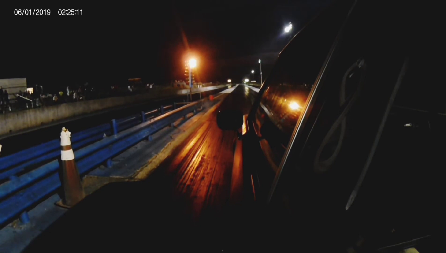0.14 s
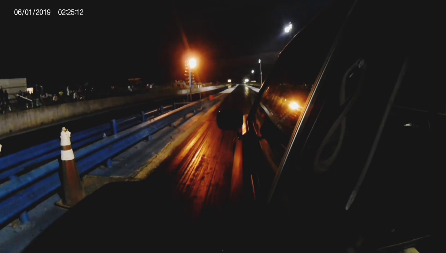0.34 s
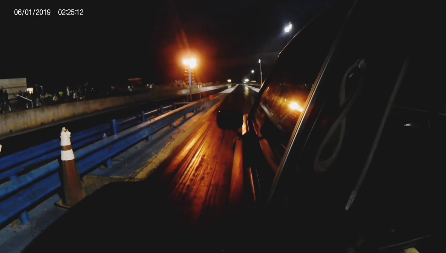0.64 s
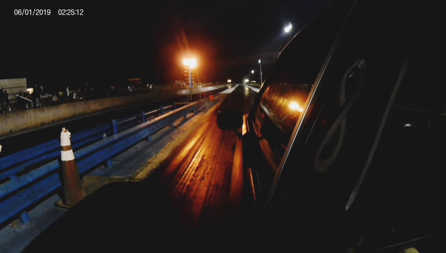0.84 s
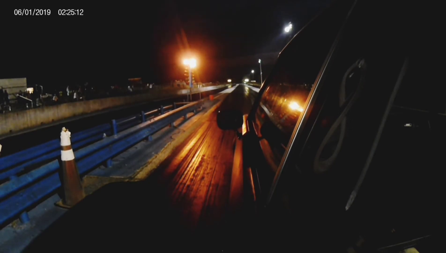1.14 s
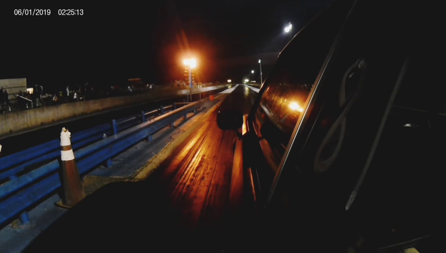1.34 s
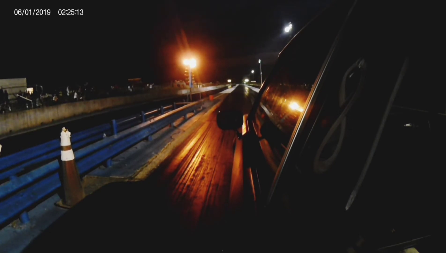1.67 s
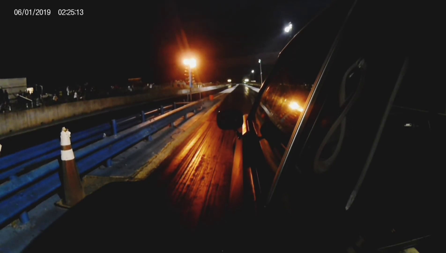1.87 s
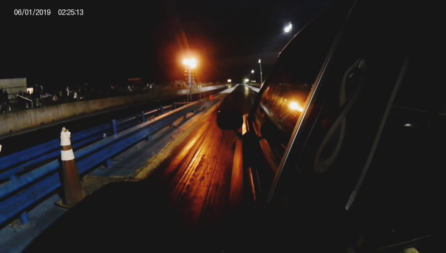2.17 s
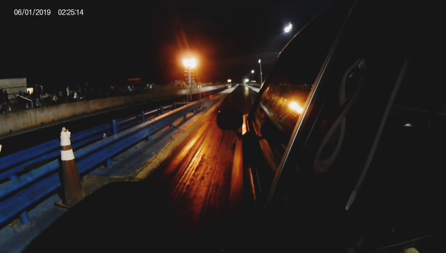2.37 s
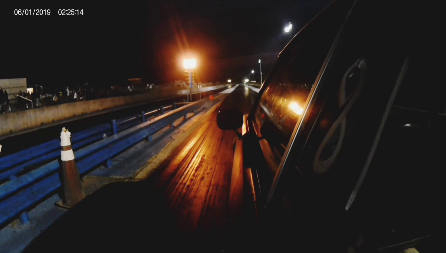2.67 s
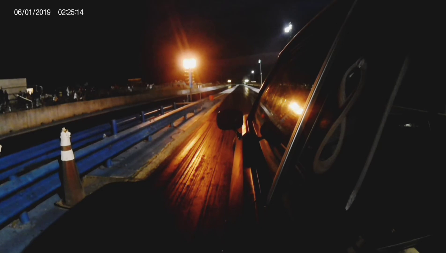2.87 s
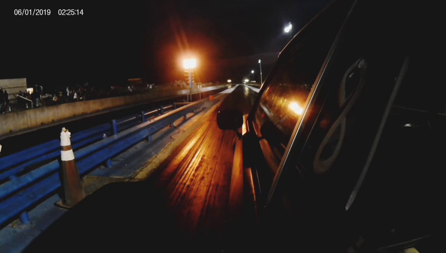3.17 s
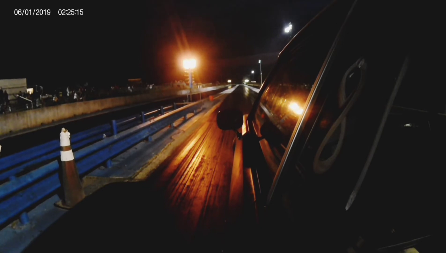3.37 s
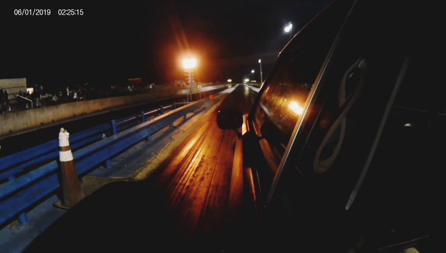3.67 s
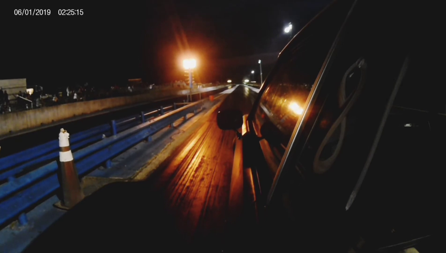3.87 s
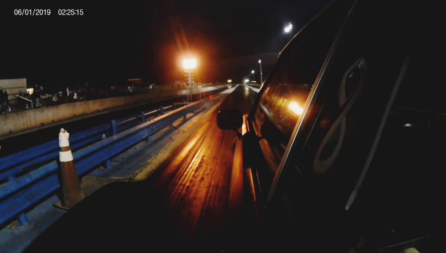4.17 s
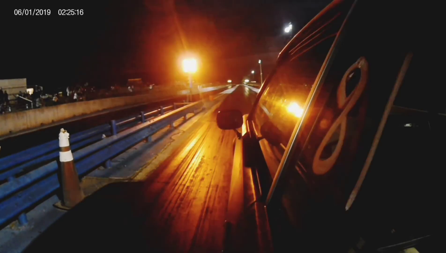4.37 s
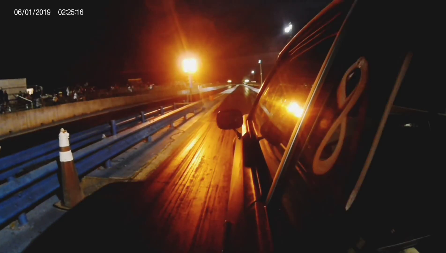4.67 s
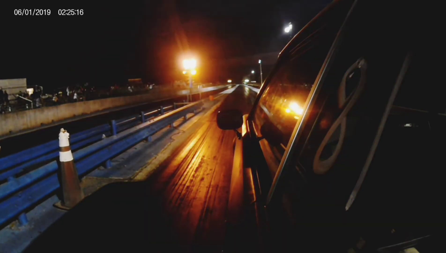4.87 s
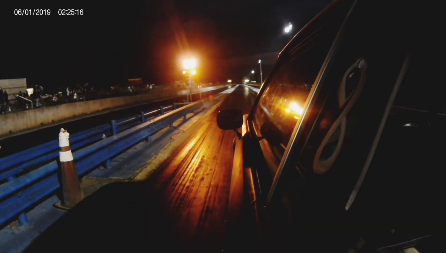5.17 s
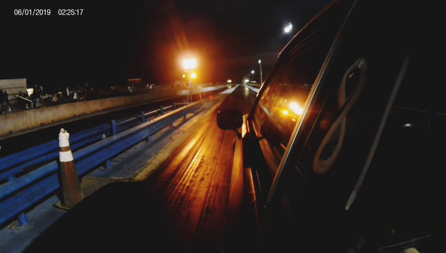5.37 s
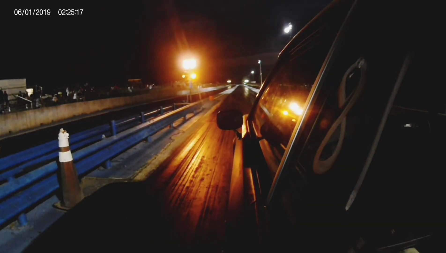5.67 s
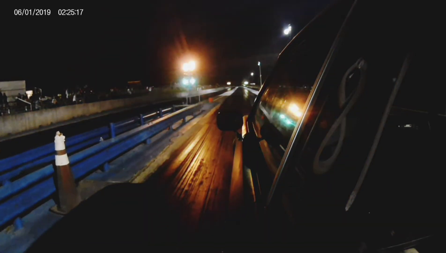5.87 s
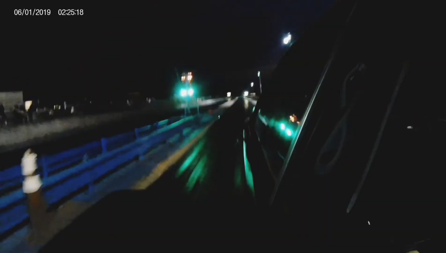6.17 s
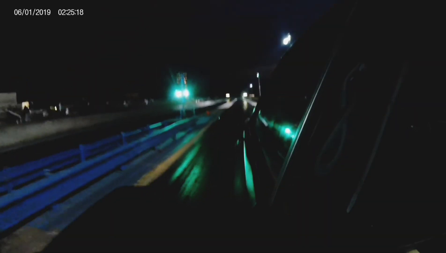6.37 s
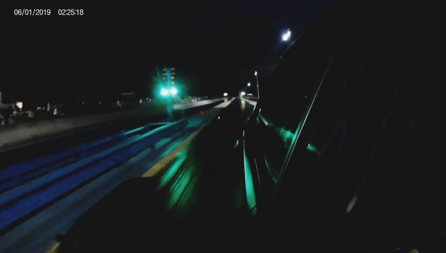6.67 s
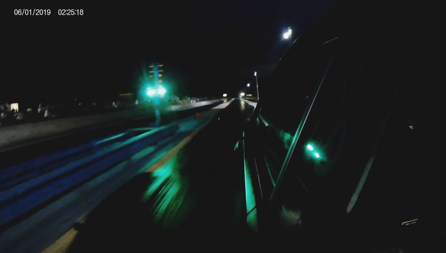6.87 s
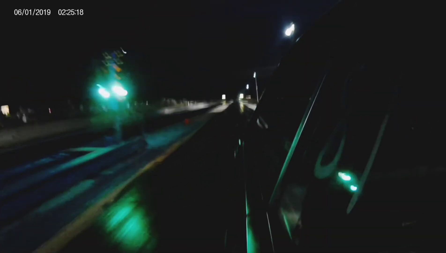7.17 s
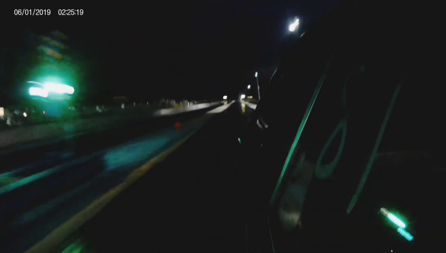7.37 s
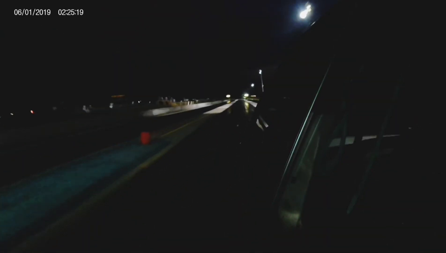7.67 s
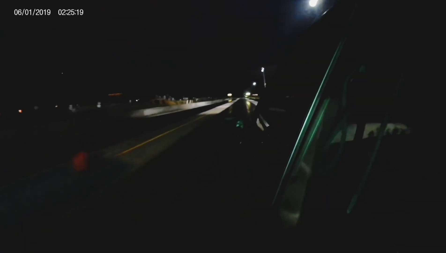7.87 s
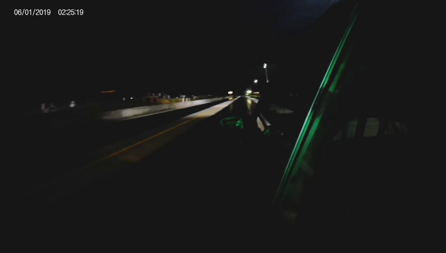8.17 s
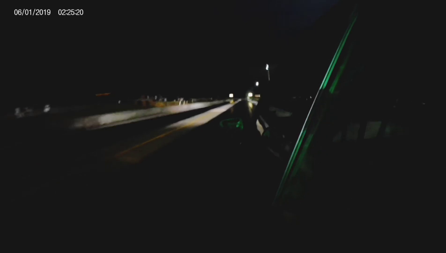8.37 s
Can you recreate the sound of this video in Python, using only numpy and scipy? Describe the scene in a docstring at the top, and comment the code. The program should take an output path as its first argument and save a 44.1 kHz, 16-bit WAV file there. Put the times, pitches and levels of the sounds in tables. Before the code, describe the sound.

Close, vibrating on-car perspective: lumpy V8 idle, deep flutter near ninety hertz and small housing knocks for three seconds, then nearly three seconds of choppy buzzing rattles as the engine strains on the brake. The revs leap, and a much louder, slightly saturated exhaust roar pulls down the track with low wind rumble, rasping panels and a late heavy shudder.

```python
"""Supercharged V8 at the start line

The engine lopes, surges against the brake, then launches; the microphone rides on its flank.
Exhaust orders are sums of sines and the roar is noise pulsed by the firings; both ring the bodywork.
The mount swings near 90 Hz as a rough sine and its housing knocks in each half swing, as struck modes.
A pump hums in steady harmonics; filtered noise gives the wind and road buffet and a thin whistle."""
import sys
import numpy as np
from scipy import signal
from scipy.fft import rfft, irfft
from scipy.io import wavfile
from scipy.ndimage import uniform_filter1d

SR = 44100
rng = np.random.default_rng(int(sys.argv[2]) if len(sys.argv) > 2 else 0)


def to_wav(sig):
    """Store sig (one row per channel, or 1-D mono) as 16-bit WAV at the path in sys.argv[1].

    Samples outside -1..1 are clipped; the rate is SR.
    """
    pcm = np.clip(np.atleast_2d(sig), -1, 1) * 32767
    pcm = np.round(pcm).astype(np.int16)
    wavfile.write(sys.argv[1], SR, pcm.T)  # frames by channels


N = 376173

# bodywork resonances: f/Hz, width/Hz, relative level/dB
BODY_MODES = [(90, 6.7, 7.5), (192.5, 45.6, -1.5), (232.6, 16, 3), (292, 16, -14), (539, 44, -8.5),
              (636, 36.7, 2.5), (807, 25.6, 0), (940, 23, -9), (1110, 9, -14), (1188.5, 52.5, 1),
              (1237, 25, -0.5), (1280, 48, -33), (1930, 70, -22.5), (2050, 38, -15)]
# panel behind the mount, rung by knocks and by the idling engine: f/Hz, width/Hz, relative level/dB
PANEL_MODES = [(630, 26, 0), (870, 60, -10), (670, 18, -3), (1090, 20, -11), (1240, 50, -8)]
STAGED_S, LAUNCH_S = 3.15, 5.85  # between these the firing order is heard as the swing of the mount
REST_DB = -61.5  # rattle between surges


def undb(db):
    """Amplitude ratio of a level: 20 dB for each factor of ten."""
    return 10 ** (np.asarray(db) / 20)


def level(x, db):
    """Normalization of the effective (rms) value to a level."""
    return x * undb(db) / np.sqrt(np.mean(x ** 2))


def read(table):
    """Linear interpolation of a curve's columns, one value a sample."""
    s, *columns = np.transpose(table)
    t = np.arange(N) / SR
    return [np.interp(t, s, column) for column in columns]


def band(x, hz, width):
    """Simple resonance with unit gain at its centre."""
    return signal.lfilter(*signal.iirpeak(hz, hz / width, fs=SR), x)


def modes(x, table):
    """Modal superposition: successive modes have opposite sign, which leaves notches between neighbours."""
    out = 0
    for k, (hz, width, db) in enumerate(table):
        out = out + (-1) ** k * undb(db) * band(x, hz, width)
    return out


def colour(x, points):
    """Spectral shaping by a gain curve, straight in dB over log frequency."""
    hz, db = np.transpose(points)
    f = np.arange(N // 2 + 1) * SR / N + 1
    gain = undb(np.interp(np.log(f), np.log(hz), db))
    return irfft(rfft(x) * gain, N)


def walk(rate):
    """Slow random modulation: levels held 1 / rate s and smoothed twice; spread near 1."""
    hold = int(SR / rate)
    held = np.repeat(rng.standard_normal(N // hold + 1), hold)
    return 1.32 * uniform_filter1d(uniform_filter1d(held, hold), hold)[:N]


def noise_band(noise, hz, width):
    """Narrow-band noise of unit rms: two equal resonances in series."""
    return level(band(band(noise, hz, width), hz, width), 0)


def air():
    """Turbulence as low band noise with a wavering level, and a whistle as narrow-band noise."""
    # road and wind buffet: t/s, level/dB
    buffet = [(0, -45.5), (5.85, -56), (6.07, -28.5), (6.41, -24.5), (6.52, -30), (6.69, -30.5),
              (6.76, -26), (7.23, -29), (7.39, -33), (7.72, -44), (8.13, -38), (8.53, -40)]
    # thin whistle: start t/s, end t/s, level/dB
    whistle = [(7.539, 7.736, -40.5), (8.282, 8.407, -43)]
    whistle_hz = 8910
    t = np.arange(N) / SR
    low = band(band(rng.standard_normal(N), 70, 22), 68, 27) * undb(3.1 * walk(4.2))
    low = level(low, 0) + level(band(rng.standard_normal(N), 28, 14), -11)
    thin = level(band(band(rng.standard_normal(N), whistle_hz, 117), whistle_hz, 200), 0)
    gate = sum(undb(db) * np.clip(np.minimum(t - a, b - t) / .03, 0, 1) for a, b, db in whistle)
    return undb(read(buffet)[0]) * level(low, 0) + gate * thin


def stray():
    """Frequency-modulated sines: two short wavering tones that do not follow the revs."""
    # one curve for each tone: t/s, f/Hz, mean level/dB
    tones = [
        [(5.45, 292, -51), (5.6, 298, -34.5), (5.8, 298, -40.5), (5.92, 296, -24.5), (6.05, 294, -32)],
        [(8.15, 445, -29.5), (8.25, 462, -23), (8.4, 500, -30), (8.53, 535, -27)],
    ]
    out = 0
    for rows in tones:
        (start_s, start_hz, _), (end_s, end_hz, _) = rows[0], rows[-1]
        faded = [(start_s - .05, start_hz, -80)] + list(rows) + [(end_s + 0.053, end_hz, -80)]
        hz, db = read(faded)
        tone = np.sin(2 * np.pi * np.cumsum(hz) / SR)
        out = out + np.sqrt(2) * undb(db + 3.8 * walk(30)) * tone
    return out


def pump():
    """Harmonic series: an electric pump buzzes on multiples of its nearly steady shaft rate."""
    shaft_hz = 83.9
    # multiple of the shaft rate, level/dB before a common gain of 0.5 dB
    harmonics = [(2, -42), (4, -59), (5, -58), (6, -56), (7, -53), (10, -57), (11, -56), (12, -58),
                 (14, -59), (16, -62)]
    turn = 2 * np.pi * np.cumsum(shaft_hz * (1 + 0.001983 * walk(2.017))) / SR
    out = 0
    for k, db in harmonics:
        out = out + np.sqrt(2) * undb(db + 0.5 + 3 * walk(9)) * np.sin(k * turn + k * k)
    return out


def knocks():
    """Impulse sequence: time, level and sharpness of lone knocks, clear ones fixed and soft ones random."""
    # clearest single knocks of the housing: t/s, relative level/dB
    clear = [(0.012, -23.5), (0.0215, -33), (0.0342, -43), (0.078, -39), (0.089, -31), (0.1002, -44),
             (0.1501, -39), (0.1929, -43), (0.2453, -37), (0.2541, -30), (0.2647, -27), (0.2738, -30),
             (0.3547, -33), (0.4228, -43), (0.4422, -38), (0.5637, -35), (0.6505, -35), (0.6666, -41),
             (0.702, -32), (0.713, -43), (0.846, -39), (0.9608, -33), (1.0712, -34.5), (1.079, -40),
             (1.1187, -32), (1.1346, -29), (1.1407, -39), (1.1757, -42), (1.1856, -35), (1.2016, -41),
             (1.2277, -37), (1.2603, -27.5), (1.2804, -39), (1.292, -40), (1.3268, -37), (1.3373, -44),
             (1.3618, -31), (1.3692, -37), (1.374, -29), (1.4674, -40), (1.4953, -37), (1.6127, -38),
             (1.7154, -34), (1.824, -35), (1.8298, -45), (1.8407, -34), (1.9064, -27.5), (1.9164, -29),
             (1.9456, -28), (2.0218, -41), (2.0421, -35), (2.0578, -38), (2.0733, -43), (2.1069, -39),
             (2.1137, -36), (2.2045, -39), (2.2177, -33), (2.2373, -26.5), (2.275, -35), (2.2862, -26),
             (2.3156, -37), (2.3253, -25), (2.3335, -38), (2.3706, -44), (2.4073, -38), (2.4176, -34),
             (2.446, -26), (2.4566, -33), (2.4784, -35), (2.4948, -38), (2.5318, -34), (2.5516, -37),
             (2.5827, -36), (2.6188, -35), (2.6455, -35), (2.6553, -33), (2.7356, -34), (2.7878, -26),
             (2.8395, -41), (2.8473, -40), (2.8988, -18.5), (2.9044, -27), (2.914, -39), (2.985, -30),
             (2.9969, -34), (3.0078, -28), (3.0915, -39), (3.1043, -39), (3.1253, -42), (3.1451, -32),
             (3.1596, -14), (3.2394, -20), (3.2451, -15), (3.256, -24), (3.2662, -24), (3.2827, -20),
             (3.2931, -18), (3.385, -24), (3.4138, -19.5), (3.418, -27), (3.4231, -21), (3.4604, -23),
             (3.4666, -18), (3.5054, -20), (3.5103, -28), (3.552, -26), (3.5564, -20), (3.5676, -24),
             (3.653, -20), (3.6593, -20), (3.6865, -26), (3.697, -20), (3.721, -21), (3.739, -13.5),
             (3.754, -18), (3.7774, -24), (3.7827, -16), (3.8167, -21), (3.8277, -16), (3.833, -17),
             (3.8723, -18), (3.9285, -18), (3.9339, -21), (3.965, -24), (4.022, -36), (4.1259, -34),
             (4.1468, -20.5), (4.1636, -24), (4.2036, -26), (4.2139, -30), (4.227, -25), (4.2524, -32),
             (4.284, -28), (4.2923, -29), (4.3303, -30), (4.3359, -32), (4.3884, -23), (4.4018, -21),
             (4.421, -20), (4.4306, -16.5), (4.4605, -24), (4.4695, -19), (4.4761, -17), (4.5096, -31),
             (4.5207, -29), (4.5803, -26), (4.5927, -25), (4.6103, -19.5), (4.6176, -28), (4.6289, -23),
             (4.6989, -19), (4.7084, -17.5), (4.746, -21), (4.7575, -19), (4.7797, -30), (4.8165, -27.5),
             (4.8277, -27), (4.8653, -40), (4.8822, -35), (4.8881, -37), (4.8956, -36), (4.9425, -21),
             (4.9537, -29), (4.9647, -26), (5.005, -30), (5.0585, -26), (5.0713, -19), (5.1122, -29),
             (5.1284, -21), (5.1389, -22), (5.1611, -22), (5.1725, -24), (5.181, -26), (5.224, -32),
             (5.3151, -22), (5.324, -26), (5.3351, -24), (5.3505, -24), (5.3553, -15), (5.3853, -21),
             (5.399, -14), (5.4344, -17), (5.4452, -22), (5.4502, -28), (5.4812, -23), (5.49, -21),
             (5.5303, -17), (5.5428, -29), (5.5763, -24), (5.5982, -18), (5.6419, -15), (5.7519, -19),
             (5.762, -16), (5.8319, -19), (5.848, -14.5)]
    soft_count, soft_db, soft_spread_db = 60, -52, 2
    sharp_db, sharp_spread_db = -11.5, 2  # sharp part of any knock, relative to the dull part
    even = rng.random(soft_count)
    chance = rng.standard_normal((soft_count + len(clear), 2))
    soft = np.transpose([STAGED_S * even, soft_db + soft_spread_db * chance[:soft_count, 0]])
    s, db = np.vstack([soft, clear]).T
    return zip(s, db, np.minimum(sharp_db + sharp_spread_db * chance[:, 1], 0))


def rattle(halves, loose_db):
    """Impact excitation of modes: the loose housing knocks once a half swing, harder on one side, and scrapes."""
    # dull, sharp and thin housing modes: f/Hz, width/Hz, relative level/dB
    housing = [(510, 204, 1), (1210, 600, -4), (2176, 427, 4)]
    # modes of the sharp part of the blows: f/Hz, width/Hz, relative level/dB
    edge_modes = [(3523, 120, 4), (4514, 316, 0.5), (4647, 410, -1.5), (6350, 2100, -9)]
    # modes of the thin scraping noise: f/Hz, width/Hz, relative level/dB
    thin_modes = [(8750, 300, -21), (11560, 160, -20)]
    knock_db, panel_db = 21, -1  # gain of the lone blows; panel ringing
    count = halves.astype(int)
    chance = np.clip(rng.standard_normal((N // 100, 3)), -2, 1.5)
    # contact falls about 0.3 of the way through each half swing
    since = halves % 1 - np.clip(0.3048 + .08 * chance[count, 0], .05, .9)
    contact = np.diff(1. * (since > 0), prepend=0) > 0
    lopsided_db = np.clip(.8 * (-26 - loose_db), 3, 12)  # gentle swings favour one stop
    size = undb(2.2 * chance[count, 1] - lopsided_db * (count % 2))
    side = 1 - 2 * (count % 2)
    # the scrape swells into the contact and dies away after it
    scrape = size * np.exp(-np.abs(since) / np.where(since > 0, .22, .16)) + .06
    noise = rng.standard_normal(N)
    dull = undb(loose_db + 35) * (side * size * contact + 0.14 * scrape * noise)
    sharp = undb(-6.5 + 1.8 * chance[count, 2]) * dull
    thin = modes(undb(loose_db + 18.0) * noise, thin_modes)

    t, hit_s = np.arange(N // 1000) / SR, 30 / SR
    burst = 0.17 * np.exp(-np.abs(t - hit_s) / np.where(t > hit_s, .0018, .001))
    for s, db, sharp_db in knocks():
        at = slice(int(s * SR), int(s * SR) + len(t))
        blow = undb(knock_db + db) * ((t == hit_s) + burst * noise[at])
        dull[at] += blow
        sharp[at] += undb(sharp_db) * blow

    edge_band = signal.butter(4, [2900, 6800], "band", fs=SR, output="sos")
    edge = signal.sosfilt(edge_band, modes(sharp, edge_modes))
    body = band(modes(dull, housing), 1300, 2700)
    panel = undb(panel_db) * modes(dull, PANEL_MODES)
    return body + panel + edge + band(thin, 9200, 5000)


def surge():
    """Piecewise-linear envelope in dB: each surge lifts the rattle by a quick rise, a slope, a slower fall."""
    # surges against the brake: start t/s, end t/s, rattle level/dB at start, rattle level/dB at end
    surges = [(3.218, 3.291, -33.5, -29.5), (3.384, 3.433, -35.5, -29.5), (3.459, 3.52, -32, -32),
              (3.535, 3.571, -32.5, -33.5), (3.588, 3.631, -33, -34.5), (3.645, 3.707, -32, -32.5),
              (3.72, 3.79, -34.5, -27.5), (3.808, 3.958, -30.5, -33), (4.142, 4.168, -46, -45),
              (4.214, 4.23, -36.5, -42), (4.258, 4.34, -47, -49.5), (4.398, 4.532, -32, -33),
              (4.572, 4.674, -37.5, -40), (4.694, 4.708, -40, -39), (4.749, 4.9, -41, -48.5),
              (4.957, 4.962, -32, -38.5), (5.0, 5.018, -45, -46), (5.047, 5.18, -40.5, -36),
              (5.311, 5.687, -35, -29), (5.749, 5.757, -30, -36.5), (5.838, 5.847, -24, -36)]
    rise_db_s, fall_db_s = 1001.5, 447.5
    t, out = np.arange(N) / SR, np.full(N, 1. * REST_DB)
    for a, b, a_db, b_db in surges:
        times = [a - (a_db - REST_DB) / rise_db_s, a, b, b + (b_db - REST_DB) / fall_db_s]
        out = np.maximum(out, np.interp(t, times, [REST_DB, a_db, b_db, REST_DB]))
    return out


def mount(cycle_hz, lift_db):
    """Oscillation of the mount: a near sine and a rough upper skirt that fades with revs; also half swings."""
    # swing without surges and brief drops: t/s, mean f/Hz, level/dB
    swing_curve = [(0, 94.64, -23), (.6, 90, -25.5), (1.1, 95.35, -26), (1.35, 95.7, -24),
                   (1.6, 91.04, -24), (2.25, 88.87, -22.5), (2.7, 96.7, -25.5), (3.1, 92.94, -22.5),
                   (3.26, 95.34, -21.5), (3.53, 88.75, -23), (3.93, 88.14, -21), (4.1, 84.86, -22),
                   (4.42, 88.16, -24.5), (5.57, 87.9, -23), (5.67, 92.2, -19), (5.85, 116.9, -27),
                   (5.95, 120.5, -20), (5.99, 121.9, -69), (7.6, 83.84, -56), (7.69, 83.1, -27),
                   (7.84, 87.93, -19), (8.02, 88.17, -8.5), (8.28, 90.7, -10.5), (8.36, 89.1, -22),
                   (8.53, 89.6, -26)]
    # brief drops of the swing, at idle, between surges and at launch: t/s, depth/dB, half length/s
    drops = [(0.23, 3, 0.019), (0.326, 12, 0.034), (0.392, 9, 0.037), (0.519, 13, 0.026), (0.752, 7, 0.065),
             (0.965, 8, 0.052), (1.212, 7.5, 0.044), (1.296, 27, 0.022), (1.487, 14, 0.11),
             (1.77, 10, 0.065), (1.96, 12, 0.047), (2.167, 14, 0.029), (2.4, 16, 0.036), (2.59, 6, 0.046),
             (2.718, 15, 0.059), (3.2, 9.5, 0.03), (3.994, 9, 0.029), (4.047, 7, 0.023), (5.718, 10, 0.026),
             (5.892, 27, 0.041)]
    t, (hz, db) = np.arange(N) / SR, read(swing_curve)
    db = db + lift_db
    for s, depth_db, half in drops:
        db = db - np.interp(t, [s - half, s, s + half], [0, depth_db, 0])
    slow = 11 - cycle_hz  # slow running is less regular
    turns = np.cumsum(hz * (1 + .045 * np.clip(slow, .2, 1) * walk(25))) / SR
    second = undb(-17) * np.clip(slow, .4, 1) * np.sin(4 * np.pi * turns + 1.)
    swing = np.sin(2 * np.pi * turns) + second
    skirt = level(band(band(rng.standard_normal(N), 110.5, 14), 106.0, 17), -11.5) * (9 / cycle_hz) ** 2
    waver_db = np.clip(15 / cycle_hz, 0, 2) * walk(22.09)
    return np.sqrt(2) * undb(db + waver_db) * (swing + skirt), 2 * turns


def roar(hz, scatter_db):
    """Pulsed turbulence: a puff of gas after each firing rings the bodywork; blower whines and panels rasp."""
    # firing strength of the cylinders in order: level/dB
    cylinders_db = np.array([-8.5, -10.5, -18.0, 0.0, -6.5, -8.5, -10.5, -4.5])
    # gas noise under load, then off load: f/Hz, relative spectral level/dB
    load_colour = [(40, -27), (150, -14), (220, -8.5), (400, -8), (630, -7), (1200, -10.5), (1500, -9),
                   (2150, -17), (2800, -28.5), (3450, -23), (4000, -37), (5200, -32.5), (6500, -36),
                   (8000, -48.5)]
    idle_colour = [(40, -18), (110, -14.5), (185, 1), (260, -7.5), (330, -17), (540, -22.5), (640, -15.5),
                   (730, -19.5), (950, -15.5), (1300, -21), (1700, -25), (2600, -45.5), (3450, -52.5),
                   (6500, -49), (8000, -48)]
    # blower whine before its resonance: multiple of the engine cycle, relative level/dB
    blower = [(79.4, -29), (73.5, -37), (86.3, -35)]
    # panels that rasp unevenly under load: f/Hz, width/Hz, relative level/dB
    rasp_bands = [(1836, 120, -19.5), (3088, 67, -31), (3490, 300, -28), (4870, 1400, -36.5)]
    # thin bands that flutter at idle: f/Hz, width/Hz, relative level/dB
    flutter_bands = [(3330, 260, -38.5), (4300, 700, -46.5), (5400, 900, -44.5)]
    hiss_db, panel_idle_db, flutter_patchy_db = -40, -4, 6
    firing = np.cumsum(8 * hz) / SR  # eight firings in an engine cycle
    count = firing.astype(int)
    size = undb(cylinders_db[count % 8] + scatter_db * rng.standard_normal(N // 50)[count])
    gas = (.75 + size * np.exp(-(firing % 1) / .4)) * rng.standard_normal(N)
    gas = gas / np.sqrt(uniform_filter1d(gas ** 2, SR // 4))  # even out the slow level

    turn = 2 * np.pi * np.cumsum(hz * (1 + .011 * walk(60))) / SR
    whine = sum(undb(db + 5 * walk(16)) * np.sin(k * turn) for k, db in blower)
    whine = 2 * band(whine, 3230, 300)
    rasp = sum(undb(db + 4.7 * walk(14)) * noise_band(gas, f, width) for f, width, db in rasp_bands)
    hiss = undb(hiss_db + 2 * walk(11)) * band(gas, 8000, 9000)  # treble hiss of the exhaust gas
    flutter = 0
    for f, width, db in flutter_bands:
        flutter = flutter + undb(db + flutter_patchy_db * walk(22)) * noise_band(gas, f, width)
    panel = undb(2.5 * walk(9)) * level(modes(rng.standard_normal(N), PANEL_MODES), panel_idle_db)

    load = np.clip((hz - 12) / 10, 0, 1)
    idle = level(colour(gas, idle_colour), 5.4) + np.minimum(9 / hz, 1) ** 2 * (panel + flutter)
    # the lowest body mode is left out of the roar
    loaded = level(colour(gas, load_colour), -5.0) + level(modes(gas, BODY_MODES[1:]), -1.5)
    return load * (loaded + whine + rasp) + (1 - load) * idle + hiss


def body_gain(hz, between_db=-20, low_hz=120):
    """Resonant transmission of a steady tone by the bodywork; the deepest tones hardly radiate."""
    power = sum(undb(2 * db) / (1 + (2 * (hz - f) / width) ** 2) for f, width, db in BODY_MODES)
    return np.sqrt(power + undb(2 * between_db)) / (1 + (low_hz / hz) ** 3)


def lead_db(hz, idle_db, pull_db):
    """Resonance crossing: a leading order is steady at idle and swells on the pull at low resonances."""
    # low resonances that lift the sixth and the firing order: f/Hz, width/Hz, lift/dB
    boom_modes = [(203, 7.1, 5), (226.6, 8.1, 10), (255, 20.7, 12), (293.7, 10, 15)]
    t = np.arange(N) / SR
    boom = 1 + sum(undb(2 * db) / (1 + (2 * (hz - f) / width) ** 2) ** 2 for f, width, db in boom_modes)
    return np.where(t < STAGED_S, idle_db, np.where(t < LAUNCH_S, -60, pull_db + 10 * np.log10(boom)))


def exhaust(hz, scatter_db, sixth_db, firing_db, rest_db):
    """Fourier series of the engine cycle: wavering orders, louder as they cross a body resonance."""
    # exhaust at the pipe, keyed by multiple of the cycle: relative level/dB
    pipe_db = {1: 2, 2: 0, 3: 1, 4: -4, 5: -1.2, 7: -11, 9: 4, 10: -11, 11: 0.79, 12: 2.4, 13: 2.2, 14: 1,
               15: -6, 16: -0.57, 17: -6, 18: -2.2, 19: -2, 20: 0, 21: -1.4, 22: -6, 26: -4.5, 27: 1.3, 28:
               -2.5, 30: -9.5}
    upper_db, end_order = -7.5, 62  # level of orders not listed; the series stops below end_order
    turn, out = 2 * np.pi * np.cumsum(hz * (1 + 0.002062 * walk(12))) / SR, 0
    step = slice(None, None, 128)  # gains are computed sparsely and interpolated
    for k in sorted(set(range(1, end_order)) - {6, 8}):
        gain = undb(pipe_db.get(k, upper_db)) * body_gain(k * hz[step]) * undb(scatter_db * walk(15))[step]
        gain = np.interp(np.arange(N), np.arange(N)[step], gain)
        out = out + gain * np.sin(k * turn + 1.26 * rng.standard_normal())
    lead = undb(sixth_db) * np.sin(6 * turn) + undb(firing_db) * np.sin(8 * turn)
    lumpy = undb(np.clip(30 / hz, 1, 3.5) * walk(18))  # slow running is lumpier
    return undb(rest_db - 9.0) * out + np.sqrt(2) * lumpy * lead


def scene():
    """Linear superposition of all sources, driven by the shared speed, load and surge curves."""
    # engine speed: t/s, engine cycle f/Hz
    speed = [(0, 9.1), (0.5, 7.7), (1.0, 8.55), (1.4, 8.4), (2.5, 9.5), (2.9, 7.55), (3.09, 9.5),
             (3.3, 11.6), (3.51, 10.7), (5.49, 10.9), (5.65, 11.5), (5.82, 14.2), (6.16, 32.8),
             (6.28, 34.6), (6.44, 37.2), (6.64, 38.4), (6.84, 40.0), (7.3, 39.5), (7.42, 39.8),
             (7.69, 42.1), (7.81, 43.6), (8.02, 45.6), (8.08, 45.8), (8.15, 45.0), (8.24, 43.5),
             (8.34, 41.1), (8.4, 40.5), (8.53, 40.0)]
    # load without the surges: t/s, relative level/dB of the clean orders, relative level/dB of the roar
    load_curve = [(0, -38.5, -41), (2, -44, -40), (2.3, -38, -36.5), (2.8, -43, -41), (3.3, -37.5, -38.5),
                  (3.75, -38, -41), (4.3, -35, -38), (5.7, -32, -38.5), (5.8, -31.5, -35), (5.97, -17, -23),
                  (6.13, -14, -14), (6.19, -14, -19.5), (6.43, -10, -14), (6.74, -13, -13.5),
                  (6.99, -12, -16), (7.46, -11, -15.5), (7.64, -9.5, -13.5), (8.43, -10.5, -12),
                  (8.53, -11, -18)]
    # looseness of the mount without the surges: t/s, mean rattle level/dB
    looseness = [(0, -56), (.6, -64), (2.1, -56.5), (2.4, -52.5), (2.8, -58), (3.98, -55), (4.06, -54.5),
                 (4.2, -41.5), (4.33, -59), (4.37, -48), (4.6, -51), (5.2, -49), (5.25, -64), (5.8, -53),
                 (6.12, -46), (6.23, -37.5), (7.39, -48), (7.62, -51.5), (7.76, -33), (7.94, -36),
                 (7.97, -25), (8.0, -34.5), (8.14, -28.5), (8.28, -30.5), (8.32, -44), (8.53, -52)]
    idle_sixth_db, idle_firing_db = -53, -36.5
    pull_sixth_db, pull_firing_db = -16, -16  # relative to the clean orders
    firing_fade_db_hz, full_hz = 0.79, 37.9  # the firing order weakens as the cycle rate rises
    swing_per_db, roar_per_db = 0.2437, 0.3135  # dB gained for each dB that a surge lifts the rattle
    (hz,), (clean_db, roar_db) = read(speed), read(load_curve)
    surge_db = surge()
    lift_db = surge_db - REST_DB
    swing, halves = mount(hz, swing_per_db * lift_db)
    sixth_db = lead_db(6 * hz, idle_sixth_db, clean_db + pull_sixth_db)
    firing_pull_db = clean_db + pull_firing_db + firing_fade_db_hz * (full_hz - hz)
    firing_db = lead_db(8 * hz, idle_firing_db, firing_pull_db)
    orders = exhaust(hz, 3.82, sixth_db, firing_db, clean_db)
    engine = orders + undb(roar_db + roar_per_db * lift_db - 4.5) * roar(hz, 4.3)
    loose_db = np.maximum(read(looseness)[0], surge_db) + 1.5 * walk(30)
    return (engine + swing + rattle(halves, loose_db) + pump() + stray() + air())[None]


def record(dry):
    """Filtering and saturation: the port notches and dulls the treble; peaks are rounded and the top cut."""
    # notches of the microphone port: f/Hz, width/Hz
    port = [(2850, 620), (7700, 410)]
    port_depth = .8  # share taken away at the centre of a notch
    port_top_hz, top_hz, hiss_db = 7250, 15700, -76
    for hz, width in port:
        dry = dry - port_depth * band(dry, hz, width)
    low = signal.sosfilt(signal.butter(4, port_top_hz, fs=SR, output="sos"), dry)
    heard = low + undb(-12.0) * (dry - low) + level(rng.standard_normal(N), hiss_db)
    rounded = np.tanh(0.85 * heard) / 0.92
    return signal.sosfilt(signal.ellip(8, .2, 70, top_hz, fs=SR, output="sos"), rounded)


dry = scene()
out = record(dry)
to_wav(out)
```